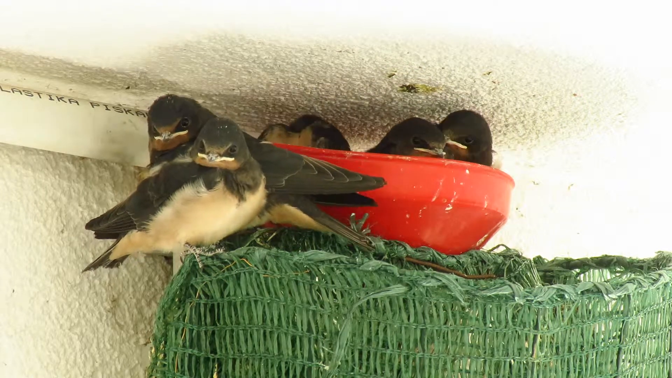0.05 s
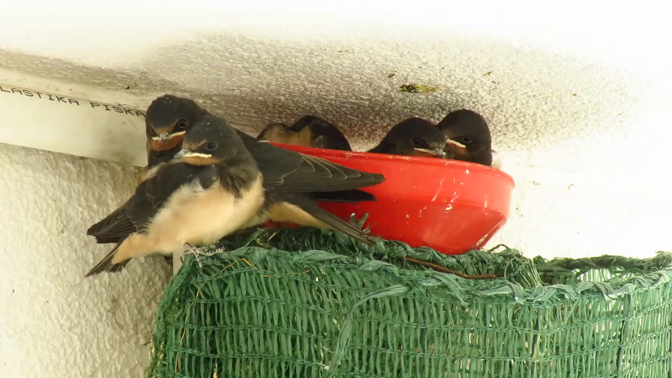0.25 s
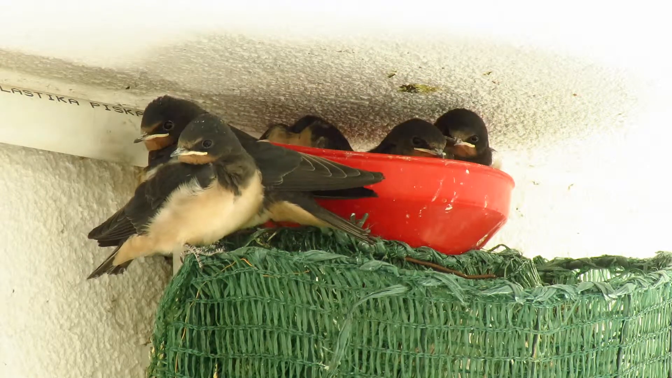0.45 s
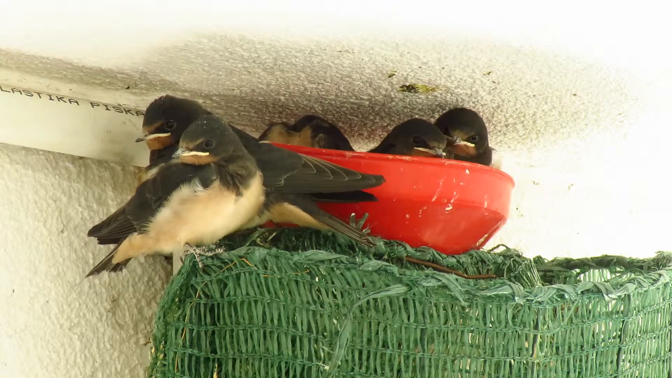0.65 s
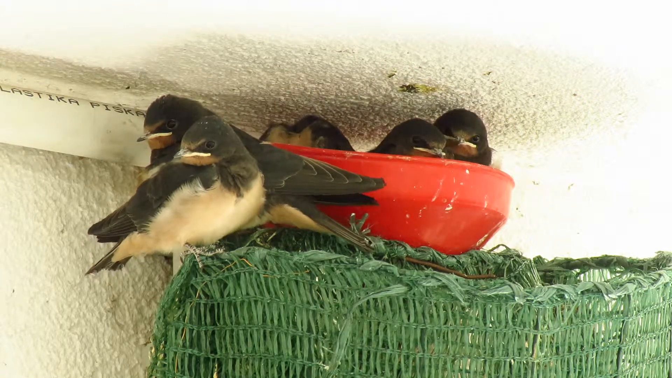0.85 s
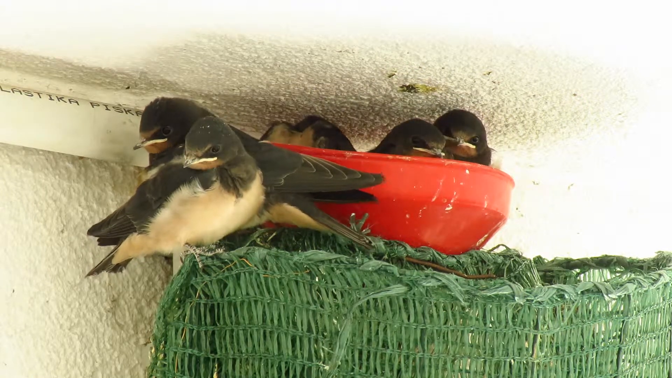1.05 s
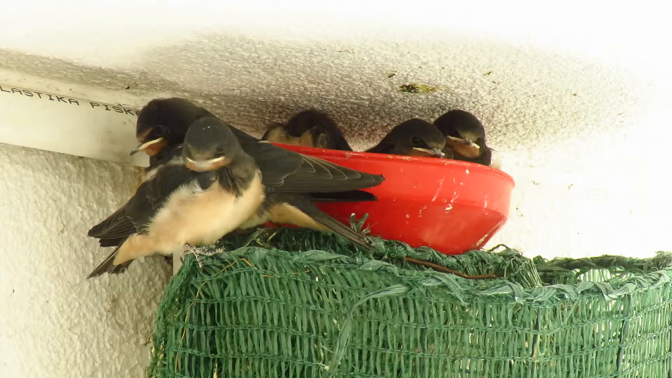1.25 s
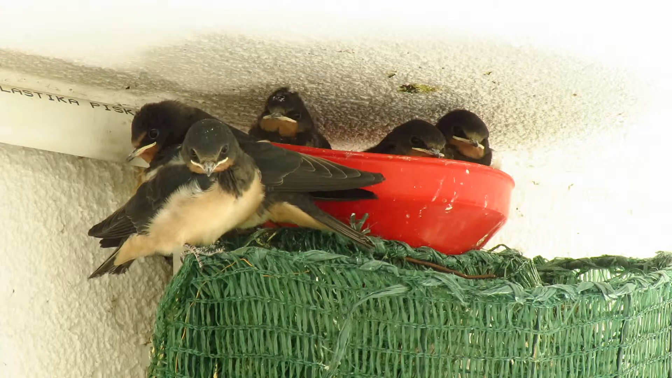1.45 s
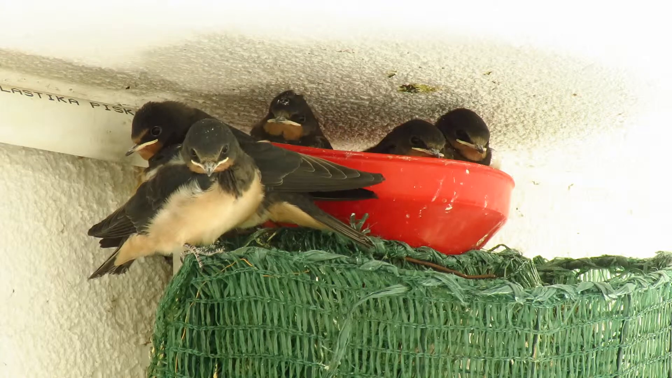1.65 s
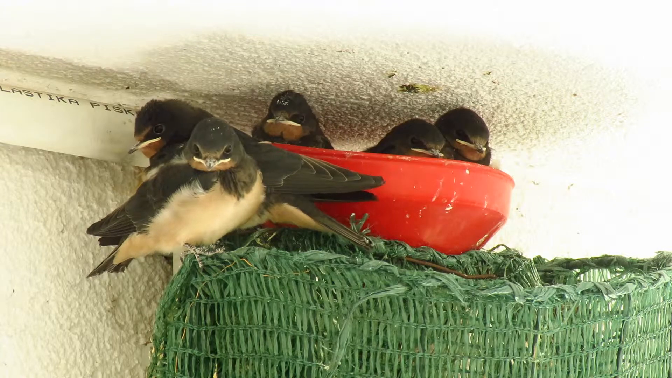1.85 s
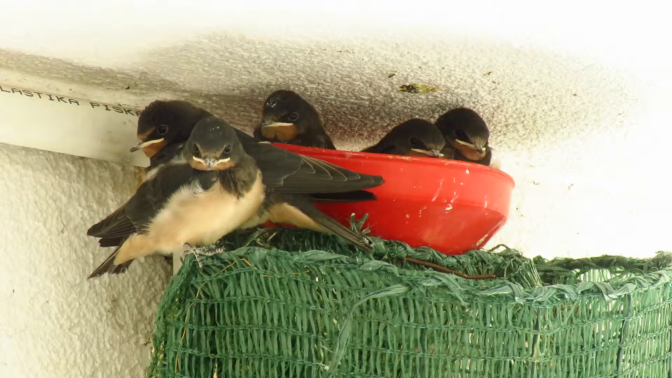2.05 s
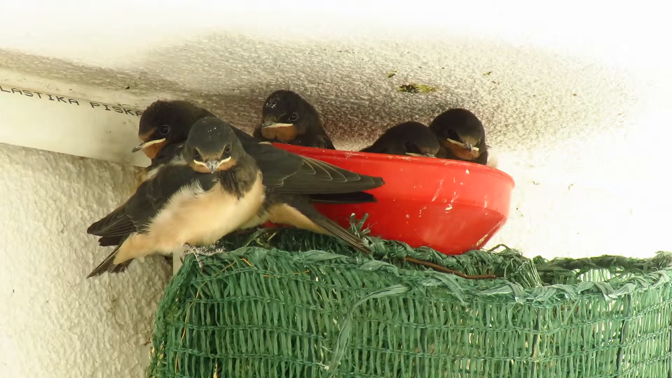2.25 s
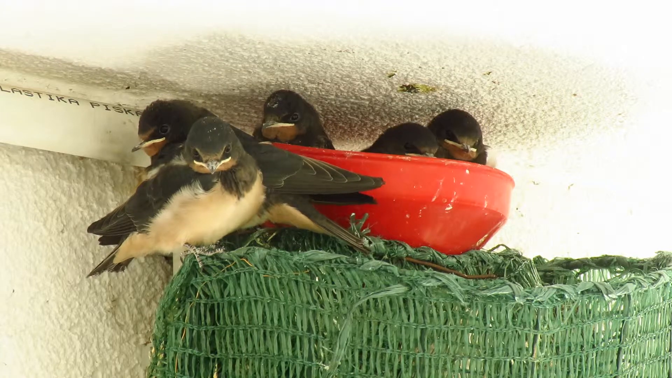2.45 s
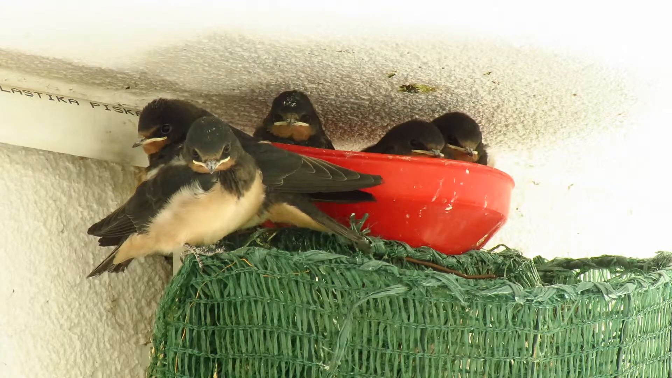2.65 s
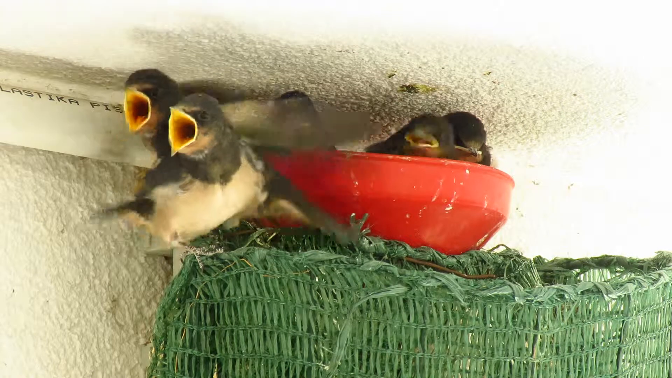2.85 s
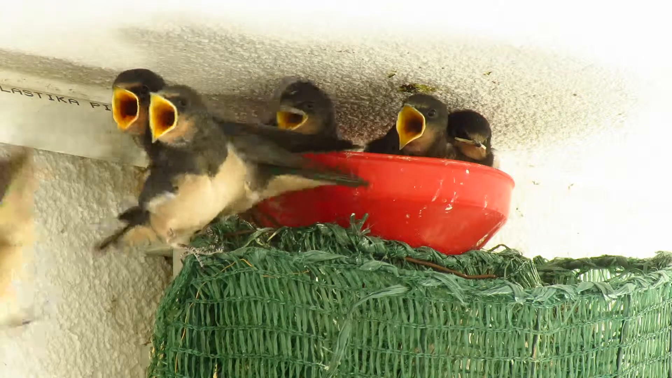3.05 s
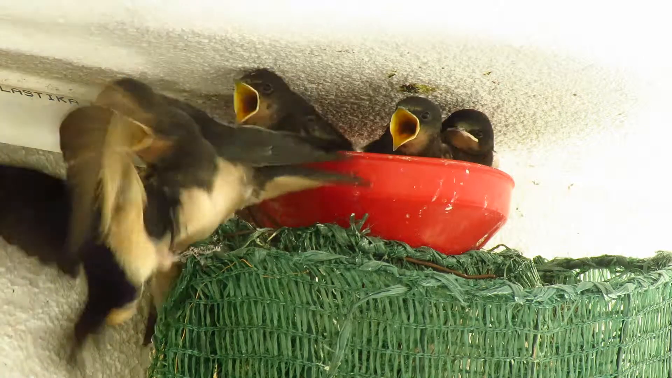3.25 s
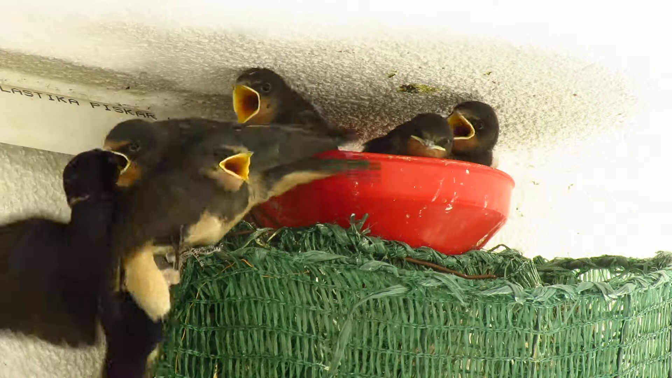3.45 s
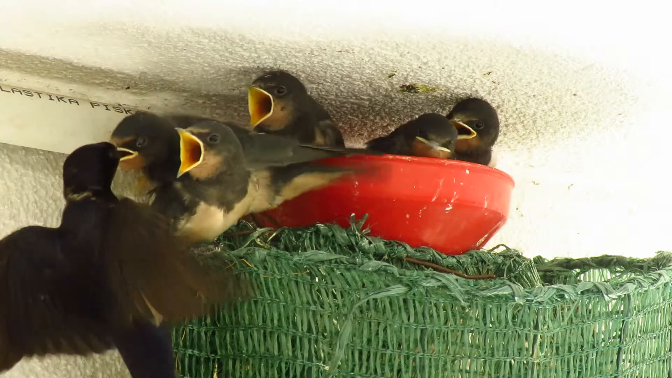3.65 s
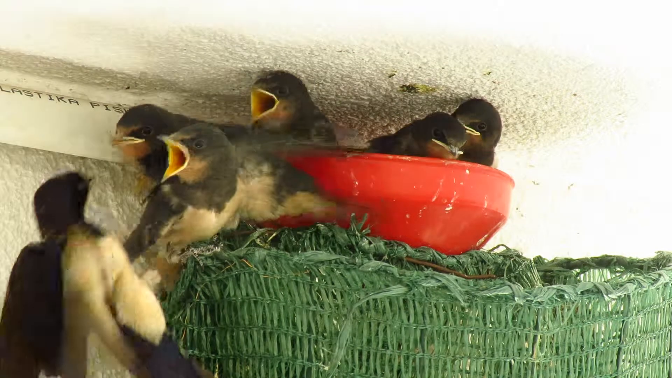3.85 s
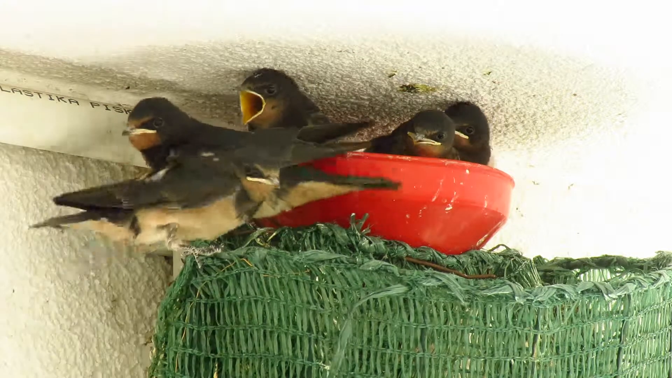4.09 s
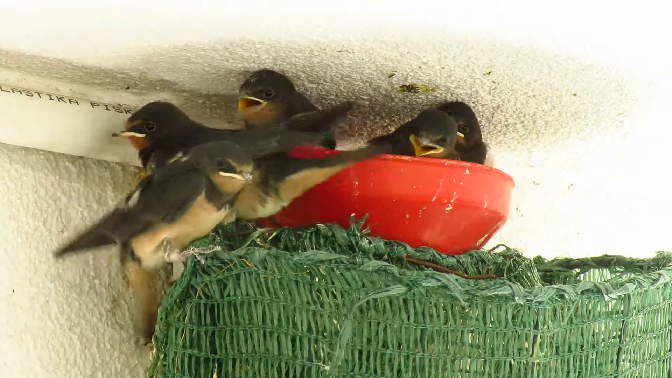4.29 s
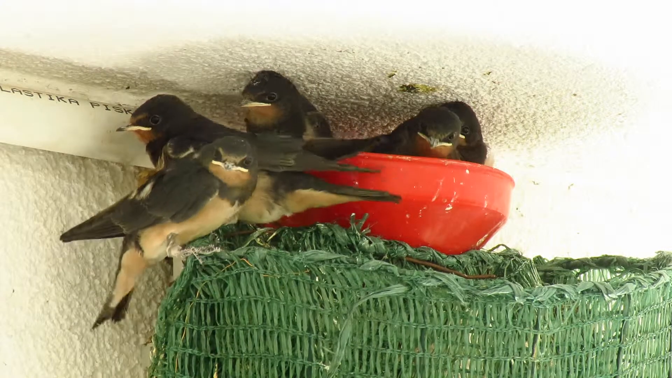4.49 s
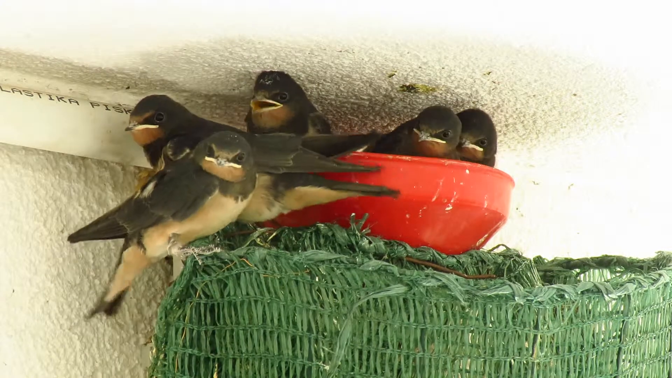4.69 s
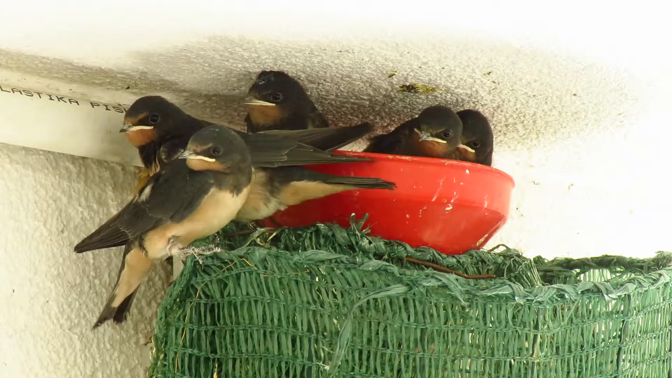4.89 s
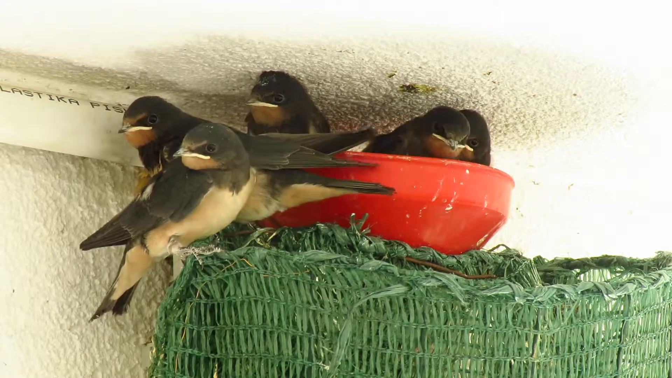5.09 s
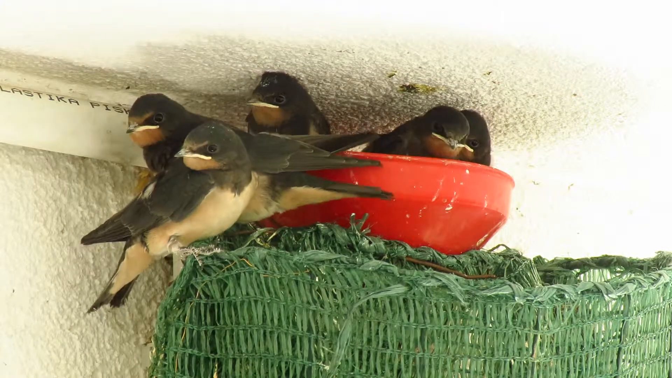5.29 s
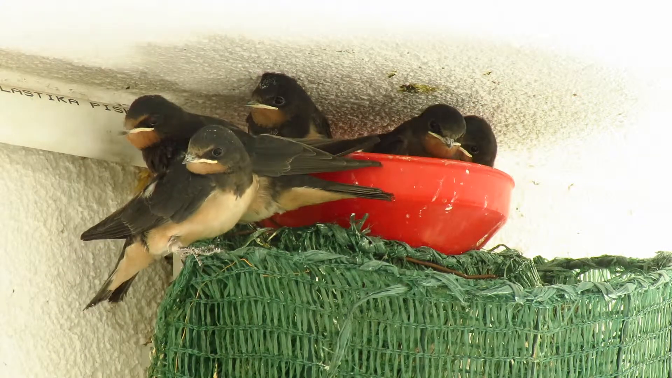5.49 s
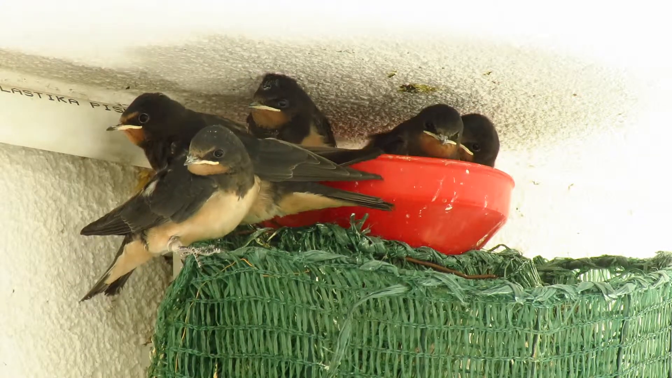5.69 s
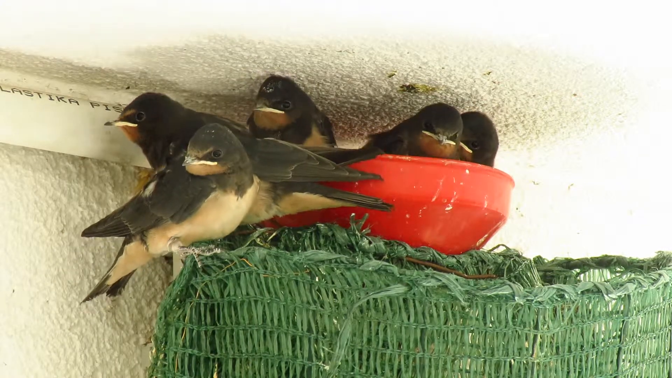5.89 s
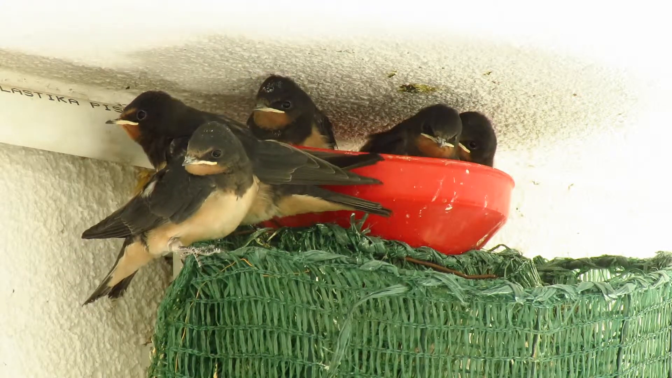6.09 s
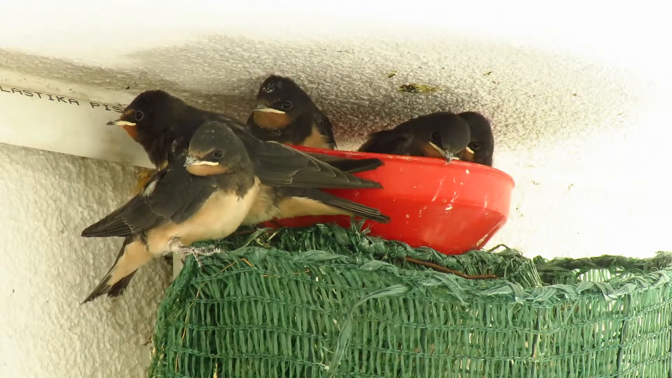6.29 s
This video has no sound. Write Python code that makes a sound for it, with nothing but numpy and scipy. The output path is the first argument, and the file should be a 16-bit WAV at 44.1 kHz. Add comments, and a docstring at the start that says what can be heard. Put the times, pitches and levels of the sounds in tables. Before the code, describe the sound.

A few gritty footsteps are followed by a quick, raspy chorus of baby birds that thins to single chirps.

```python
"""Young swallows beg on a nest under a concrete ceiling: in each call the syrinx passes from unsteady
vibration, a hoarse rasp, to a clear rising whistle. Breath hisses from their beaks and a parent lands.
Before the chorus, shoes scuff and crunch on a gritty floor, by friction and fracture.
The hard walls of the passage reflect calls and steps; distant traffic hums throughout."""
import sys
import numpy as np
from scipy import signal
from scipy.fft import rfft, irfft, next_fast_len
from scipy.io import wavfile
from scipy.ndimage import map_coordinates

SR = 44100
rng = np.random.default_rng(int(sys.argv[2]) if len(sys.argv) > 2 else 0)


def generate_wav(signal):
    """Clip the signal to [-1, 1] and save it as 16-bit WAV at the path in sys.argv[1]."""
    frames = np.transpose(np.atleast_2d(signal))
    scaled = np.clip(frames, -1, 1) * 32767
    pcm = np.round(scaled).astype(np.int16)
    wavfile.write(sys.argv[1], SR, pcm)


N = 279153


def amp(db):
    """Amplitude ratio of a level in decibels."""
    return 10 ** (np.asarray(db) / 20)


def unit(x):
    """Normalisation to rms 1."""
    return x / np.sqrt(np.mean(x ** 2) + 1e-20)


def along(points, hz):
    """Interpolation of (frequency [Hz], value) points on a logarithmic frequency axis."""
    f, v = np.transpose(points)
    return np.interp(np.log(hz + 1), np.log(f + 1), v)


def wobble(rate, size=N):
    """Smooth random modulation: a spline through `rate` Gaussian values a second."""
    return map_coordinates(rng.standard_normal(int(size * rate / SR) + 4), [np.arange(size) * rate / SR])


def swell(s, hold, rise_db_per_s, fall_db_per_s):
    """Exponential growth until time s, a hold, then exponential decay; in dB relative to the top."""
    t = np.arange(N) / SR - s
    return -np.maximum(0, np.maximum(-t * rise_db_per_s, (t - hold) * fall_db_per_s))


def filtered(x, response):
    """Linear filtering: the spectrum of x times a frequency response."""
    m = next_fast_len(x.shape[-1] + 4096)
    return irfft(rfft(x, m) * response(np.fft.rfftfreq(m, 1 / SR)), m)[..., :x.shape[-1]]


def band(lo_hz, hi_hz):
    """Causal band-pass response, third order at each edge."""
    edge = lambda s: 1 / ((1 + s) * (1 + s + s * s))
    return lambda f: edge(1j * f / hi_hz) * edge(lo_hz / (1j * (f + 1)))


def spread(pair, correlation):
    """Partial coherence: two independent signals mixed to a given left-right correlation."""
    turn = lambda hz: np.arccos(np.clip(along(correlation, hz), -1, 1)) / 2
    mid, side = filtered(pair, lambda hz: np.array([np.cos(turn(hz)), np.sin(turn(hz))]))
    return np.array([mid + side, mid - side])


def add(track, s, x):
    """Superposition of x on the track from s seconds on."""
    part = track[:, round(s * SR):][:, :x.shape[1]]
    part += x[:, :part.shape[1]]


def traffic():
    """A diffuse field of distant traffic hum, over an uneven rumble nearly coherent on both sides."""
    # spectra of hum and rumble: (frequency [Hz], relative density [dB])
    hum_spectrum = [(88, -20), (150, -7), (238, -2.5), (393, -2.5), (954, -7.5), (1540, -13.5),
                    (2400, -19.5), (2600, -21), (2920, -19), (9090, -34.5), (13400, -43.5), (15000, -55)]
    rumble_spectrum = [(13, -41), (22, -43), (54, -4), (124, -3.5), (194, -3.5), (250, -16), (320, -27),
                       (550, -120)]
    # coherence of the hum: (frequency [Hz], left-right correlation [-])
    hum_correlation = [(60, 0.87), (150, -0.55), (380, -0.073), (950, 0.55), (2380, 0.38), (5980, 0.21),
                       (15000, -0.31)]
    # slow trend of the hum: (time [s], level [dB])
    hum_trend = [(0.0, -48.5), (0.62, -46.5), (0.85, -47.5), (2.3, -47), (4.14, -45.5), (6.33, -47)]
    # swells of the rumble: (time [s], half width [s], rise [dB])
    surges = [(0.62, 0.11, 5), (2.22, 0.57, 2), (3.28, .15, 5.5), (4.14, 0.096, 10), (4.6, 0.36, 11),
              (6.2, 0.87, 3.5)]
    t = np.arange(N) / SR
    hum_db = np.interp(t, *np.transpose(hum_trend))
    rumble_db = -57.5 + sum(db * np.exp(-((t - s) / width) ** 2) for s, width, db in surges)
    hum = spread(rng.standard_normal((2, N)), hum_correlation)
    hum = unit(filtered(hum, lambda f: amp(along(hum_spectrum, f))))
    rumble = spread(rng.standard_normal((2, N)), [(40, 0.98), (150, 1.0)])
    rumble = unit(filtered(rumble, lambda f: amp(along(rumble_spectrum, f))))
    return amp(rumble_db + 1.5 * wobble(9)) * rumble + amp(hum_db + .8 * wobble(7)) * hum


def walls(x):
    """Reverberation: convolution with a fresh noise tail whose high frequencies decay fastest."""
    # reverberation time of the passage: (frequency [Hz], T60 [s])
    decay_times = [(500, 0.35), (1500, 0.33), (4000, 0.26), (8000, 0.23), (14000, 0.12)]
    # coherence of the reflections: (frequency [Hz], left-right correlation [-])
    correlation = [(500, 0.91), (1500, 0.8), (3000, 0.88), (6000, 0.18), (10000, 0.085), (14000, 0.284)]
    hz, t, spectra = signal.stft(rng.standard_normal((2, SR // 2)), SR, nperseg=256)
    decay = amp(-60 * t / along(decay_times, hz)[:, None])
    tail = spread(signal.istft(spectra * decay, SR, nperseg=256)[1], correlation)
    delayed = np.pad(x, (130, 0))[None]
    return signal.fftconvolve(delayed, tail / np.linalg.norm(tail[0]), axes=1)


def sole(f):
    """Modal response of shoe and floor: damped resonances on a flat broadband part."""
    # modes: (frequency [Hz], bandwidth [Hz], gain [dB])
    modes = [(720, 37, -6), (1314, 190, -3), (1750, 240, -5.5), (2270, 1140, -8)]
    return 0.16 + sum((-1) ** k * amp(db) * 1j * f * width / (hz * hz - f * f + 1j * f * width)
                      for k, (hz, width, db) in enumerate(modes))


def scuffs():
    """Friction noise: grit grinds under the sole in clumps of grains, heard in three bands."""
    # drags of a shoe: (start [s], hold [s], body level [dB], mid-treble [dB re body], top [dB re body])
    drags = [(0.011, 0.065, -49.5, -1.5, -11), (0.133, 0.065, -53.5, -5.5, -10),
             (0.352, .02, -45.5, -7, -14), (0.373, 0.036, -39, -7.5, -19), (0.473, 0.075, -50, -3, -14),
             (0.574, 0.025, -47, -7.5, -25), (0.79, 0.012, -51, -7, -11.5), (1.012, .05, -44.5, -9.5, -31),
             (1.114, 0.14, -46, -2.5, -32), (1.81, 0.0094, -48.5, -5, -28), (1.915, 0.034, -51, -1, -29),
             (2.211, 0.076, -56.5, 4, -20), (2.491, 0.031, -47.5, -2.5, -13.5),
             (2.607, 0.18, -53.5, -3.5, -14), (4.625, 0.026, -54.5, -20, -7)]
    responses = [lambda f: band(800, 2500)(f) * sole(f), band(3140, 3300), band(5100, 6300)]
    rise_db_per_s, falls_db_per_s = 1600, [185, 174, 304]
    grit = 0
    for k, response in enumerate(responses):
        envelope = sum(amp(db + [0, *above_db][k] + swell(s, hold, rise_db_per_s, falls_db_per_s[k]))
                       for s, hold, db, *above_db in drags)
        grains = rng.standard_normal(N) * amp(2.5 * wobble(350) + 2.5 * wobble(60))
        grit = grit + envelope * unit(filtered(grains, response))
    return grit


def impacts():
    """Impulsive excitation: stones crack, each at its own pitch, and ring hollow; the heel knocks."""
    # cracking stones: (time [s], crack peak [dB], pitch [Hz])
    stones = [(0.024, -49, 1280), (0.0657, -31.5, 1180), (0.3443, -36, 1200), (0.3696, -34, 1240),
              (0.384, -38, 1270), (0.396, -30, 1300), (0.4094, -25.5, 1680), (0.4164, -37, 1120),
              (0.568, -33.5, 1210), (0.5964, -40, 915), (0.7955, -39, 2470), (0.9517, -34.5, 1780),
              (0.9854, -36, 985), (1.0171, -20, 1300), (1.0237, -29, 1290), (1.102, -27, 1320),
              (1.1474, -24.5, 1670), (1.169, -28, 1330), (1.1992, -26.5, 1380), (1.8095, -32.5, 1780),
              (1.948, -29.5, 1540), (1.951, -34, 1560), (2.4783, -37, 1230), (2.4947, -37.5, 1210),
              (2.5352, -38, 1400)]
    # dull heel knocks: (time [s], peak [dB])
    heels = [(0.372, -38), (0.397, -43), (0.5676, -26.5), (0.5964, -36.5), (2.4783, -37)]
    ring_hz, ring_db = 1314, -11.5
    crack_t60_s, ring_t60_s, knock_t60_s = .011, .14, .17
    out, t = np.zeros((1, N)), np.arange(SR // 10) / SR
    for s, db, hz in stones:
        burst = rng.standard_normal(len(t)) * amp(-60 * t / crack_t60_s)
        response = lambda f: (band(.7 * hz, 1.5 * hz)(f) + .7 * sole(f)) * band(700, 5500)(f) ** 2
        crack = filtered(burst, response)
        cycles = np.cumsum(ring_hz * (1 + 0.042 * wobble(130, len(t)))) / SR
        ring = amp(ring_db - 60 * t / ring_t60_s) * np.sin(2 * np.pi * cycles)
        add(out, s, amp(db) * (crack / abs(crack).max() + ring)[None])
    for s, db in heels:
        burst = rng.standard_normal(len(t)) * amp(-60 * t / knock_t60_s)
        knock = filtered(burst, lambda f: band(230, 1000)(f) ** 2 * (1 + 1.2 * sole(f)))
        add(out, s, amp(db) * knock[None] / abs(knock).max())
    return out[0]


def landing(start_s=3.271, hz=290, level_db=-29, t60_s=.03):
    """Damped oscillation: the landing parent gives the nest's support one dull push."""
    t = np.clip(np.arange(N) / SR - start_s, 0, None)
    return amp(level_db - 60 * t / t60_s) * np.sin(2 * np.pi * hz * t)


def brood_hiss():
    """Breath noise: a bright, grainy hiss from the whole brood's gaping beaks swells with the calls."""
    # hiss swells: (time [s], top level [dB])
    swells = [(2.955, -36.5), (3.06, -34), (3.17, -34), (3.274, -38), (3.521, -30.5), (3.668, -36),
              (3.808, -31), (3.932, -35.5), (4.09, -35.5), (4.24, -42.5), (4.372, -39.5), (4.82, -43),
              (4.95, -52), (5.885, -57)]
    # spectrum of the hiss: (frequency [Hz], relative density [dB])
    spectrum = [(600, -40), (1500, 3), (4000, -13.5), (8000, 0), (11000, -9.5), (15500, -32)]
    start_s = 2.884  # the parent comes into sight
    envelope = sum(amp(db + swell(s, 0, rise_db_per_s=186, fall_db_per_s=296)) for s, db in swells)
    envelope *= np.arange(N) / SR > start_s
    grains = rng.standard_normal((2, N)) * amp(2.2 * wobble(250) + 5.0 * wobble(30))
    grains = spread(grains, [(2000, 1.0), (8000, 0.36)])  # wider in the treble
    return envelope * unit(filtered(grains, lambda f: amp(along(spectrum, f))))


def harmonics(pitch_hz, levels_db, jitter, rate):
    """Harmonic series with jitter in pitch and shimmer in level; also returns the running cycle count."""
    n = len(pitch_hz)
    cycles = np.cumsum(pitch_hz * (1 + .008 * wobble(110, n) + jitter * wobble(rate, n))) / SR
    tones = [amp(db + 4.07 * wobble(164, n)) * np.sin(2 * np.pi * (k * cycles + rng.random()))
             for k, db in enumerate(levels_db, 1)]
    return sum(tones), cycles


def rasp(pitch_hz, levels_db, air_db):
    """Period tripling: the unsteady syrinx chops every third cycle, adding sidebands to rushing air."""
    # spectrum of air in the throat: (frequency [Hz], relative density [dB])
    throat = [(530, -63), (900, -15), (1400, -4), (1690, -15), (1840, -1), (2120, -5.5), (2890, -0.5),
              (4550, 2.5), (4820, 3), (7680, -9.5), (10200, -19), (15500, -71)]
    n = len(pitch_hz)
    buzz, cycles = harmonics(pitch_hz, levels_db, jitter=.016, rate=600)
    chop = 1 + 1.4 * np.cos(2 * np.pi * (cycles / 3 + .1 * wobble(200, n)))
    air = rng.standard_normal(n) * amp(1.03 * wobble(306.7, n))
    air = unit(filtered(air, lambda f: amp(along(throat, f))))
    air_onset = np.clip(np.arange(n) / (0.21 * n), 0, 1)
    return unit(buzz * chop) + amp(air_db) * air * air_onset


def whistle(pitch_hz, levels_db):
    """Period doubling: strong and weak cycles alternate, adding lines halfway between clear harmonics."""
    tone, cycles = harmonics(pitch_hz, levels_db, jitter=.008, rate=450)
    return tone * (1 + .32 * np.cos(np.pi * cycles + .8 * wobble(150, len(tone))))


def chicks():
    """Change of vibration regime: a rasp swells, then locks into a whistle that rises, holds and stops."""
    # begging calls: (whistle start [s], rasp lead [s], whistle length [s], low pitch [Hz],
    # top pitch [Hz], relative rasp level [dB], relative whistle level [dB], timbre [name])
    calls = [(2.932, .051, 0.04, 1505, 2056, -33.5, -28.5, "low"),
             (2.939, 0.053, .027, 1688, 1885, -29, -22, "middle"),
             (3.047, 0.052, 0.03, 1454, 1882, -29, -25.5, "low"),
             (3.067, 0.045, .018, 1850, 1960, -29, -22, "middle"),
             (3.156, .038, .026, 1574, 1740, -26, -25, "high"),
             (3.198, 0.032, .018, 1559, 1930, -26.5, -24, "low"),
             (3.25, 0.038, .034, 1644, 1666, -26, -41, "high"),
             (3.287, 0.024, 0.028, 1670, 1773, -27.5, -37, "high"),
             (3.322, 0.024, 0.03, 1476, 1890, -28.5, -35.5, "low"),
             (3.371, 0.03, 0.021, 1584, 1660, -29.5, -35, "low"),
             (3.403, 0.033, 0.026, 1345, 1770, -27, -35.5, "high"),
             (3.512, 0.073, 0.03, 1473, 1680, -28.5, -27.5, "middle"),
             (3.538, 0.029, 0.03, 1414, 1784, -33, -34, "high"),
             (3.616, 0.036, 0.039, 1512, 1697, -28, -48, "middle"),
             (3.676, .058, 0.025, 1483, 1740, -29, -27, "husky high"),
             (3.72, .02, 0.023, 1970, 2070, -30, -48, "low"),
             (3.798, 0.062, 0.034, 1553, 1595, -29.5, -28, "husky high"),
             (3.827, .028, 0.023, 1667, 1855, -35.5, -37, "low"),
             (3.934, 0.07, 0.033, 1441, 1655, -29, -29, "husky high"),
             (3.947, 0.035, 0.02, 1512, 1756, -29, -33.5, "high"),
             (3.982, .02, 0.02, 1634, 1940, -34, -46, "low"),
             (4.074, 0.056, 0.034, 1515, 1590, -29.5, -28, "husky high"),
             (4.223, .06, 0.0342, 1452, 1553, -29, -28, "husky high"),
             (4.247, 0.037, 0.031, 1612, 1776, -27, -37.5, "middle"),
             (4.321, 0.044, 0.032, 1550, 1705, -28.5, -29.5, "middle"),
             (4.37, 0.03, 0.027, 1528, 1594, -32, -35, "high"),
             (4.371, 0.021, 0.015, 1624, 1770, -34, -34, "middle"),
             (4.417, 0.029, 0.023, 1385, 1632, -34, -33.5, "high"),
             (4.697, 0.0051, .053, 1293, 1530, -56, -41.5, "peep"),
             (4.805, 0.052, 0.031, 1552, 1810, -28.5, -23.5, "husky middle"),
             (4.935, 0.045, 0.033, 1484, 1794, -29.5, -28, "husky middle"),
             (5.86, 0.044, 0.041, 1438, 1821, -29.5, -30, "husky low"),
             (6.251, 0.032, 0.033, 1251, 1583, -39.5, -35.5, "husky low")]
    # timbres, by the harmonic the gape favours; husky ones stress the 3rd in the rasp: (harmonics
    # 1 to 4 [dB re whistle level], 3rd harmonic's gain in the rasp [dB], air [dB re buzz])
    timbres = {"low": (-22, 2, -8.5, -13.5, -4, -2.5), "middle": (-19.5, -7.5, 0.9, -9.5, -6, -3),
               "high": (-19.5, -2, -5, -0.1, -5.5, 0), "peep": (-22, -5.5, -0.7, -17, 9, -3),
               "husky low": (-18, 0.7, -6, -16, 14.5, -7), "husky middle": (-23, -4, -1, -8, 5.5, -3.5),
               "husky high": (-27, -1.5, -8, 1.2, 12, -0.5)}
    fundamental_db_per_octave, usual_hz = -65, 1445  # the 1st harmonic thins in higher calls
    left_lag_s = 18e-6  # the nest is off to the right
    out = np.zeros((2, N))
    for s, lead, length, low_hz, top_hz, rasp_db, whistle_db, timbre in calls:
        first_db, *upper_db, third_db, air_db = timbres[timbre]
        first_db += fundamental_db_per_octave * np.log2(low_hz / usual_hz)
        levels_db = np.add(whistle_db, [first_db, *upper_db, -30, -35])  # faint 5th and 6th harmonics
        t = np.arange(round((lead + length) * SR)) / SR - lead
        glide = np.clip(t / length / .78, 0, 1)  # the top pitch is held briefly
        eased = glide ** 2 * (3 - 2 * glide)
        pitch_hz = low_hz + (top_hz - low_hz) * (glide + eased) / 2
        rasp_hz = pitch_hz + 0.0401 * low_hz * np.clip(-t / lead, 0, 1)  # sags before the glide
        effort = amp(rasp_db + 10.1 * np.minimum(t / lead, 0) - 11.0 * np.maximum(t / length, 0))
        hoarse = effort * rasp(rasp_hz, levels_db + [0, 0, third_db, 0, 0, 0], air_db)
        locked = np.clip((t + 0.0081) / (0.73 * lead), 0, 1)
        edges = np.clip((t + lead) / 0.0025, 0, 1) * np.clip((length - t) / 0.0064, 0, 1)
        voice = (hoarse + 1.79 * locked * whistle(pitch_hz, levels_db)) * edges
        add(out, s - lead, amp(-1.0) * voice * amp([[-.3], [.3]]))
        add(out, s - lead, amp(-5.0) * walls(voice) * amp([[-.4], [.4]]))
    return filtered(out, lambda f: np.exp(np.array([[-1j], [1j]]) * np.pi * f * left_lag_s))


def scene():
    """Superposition of direct and reflected sound: birds and steps in the passage, over the traffic."""
    near = scuffs() + impacts() + landing()
    echo = np.zeros((2, N))
    for start in range(0, N, SR // 4):  # the walker moves, so the echo pattern keeps changing
        add(echo, start / SR, walls(near[start:start + SR // 4]))
    return chicks() + brood_hiss() + near * amp([[.3], [-.3]]) + amp(-9) * echo + traffic()


def record(dry):
    """Band limiting: an ideal low-pass removes the highest treble."""
    return filtered(dry, lambda hz: hz < 15600)


dry = scene()
out = record(dry)
generate_wav(out)
```